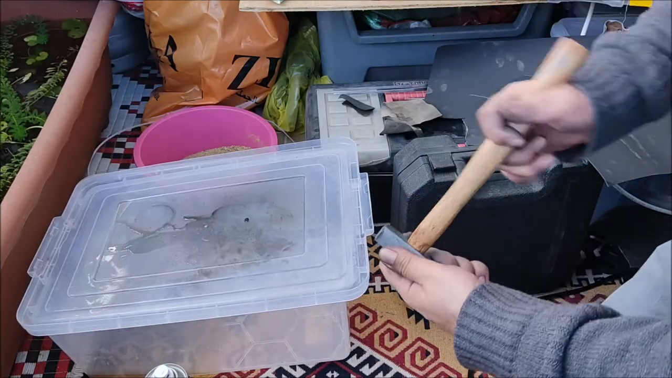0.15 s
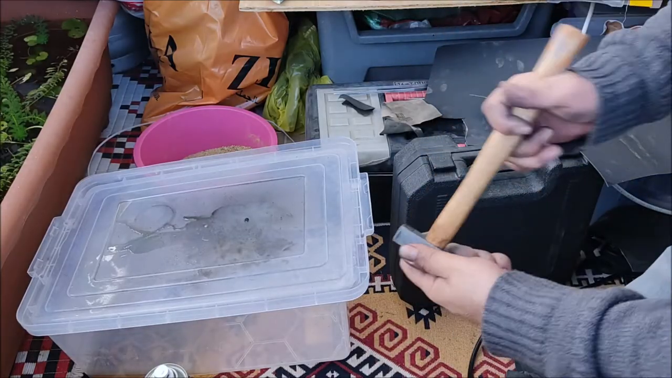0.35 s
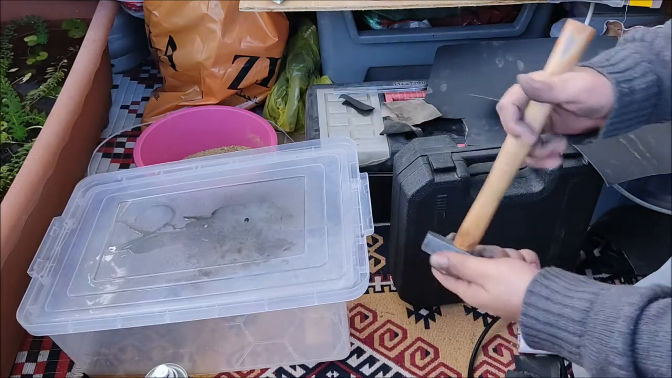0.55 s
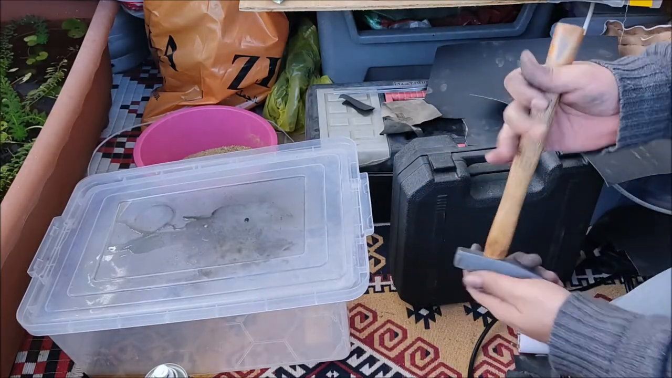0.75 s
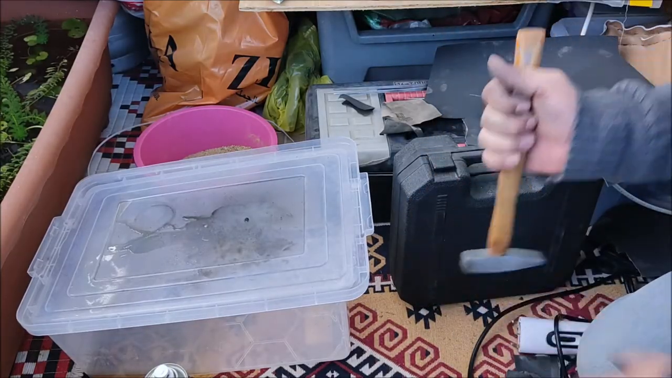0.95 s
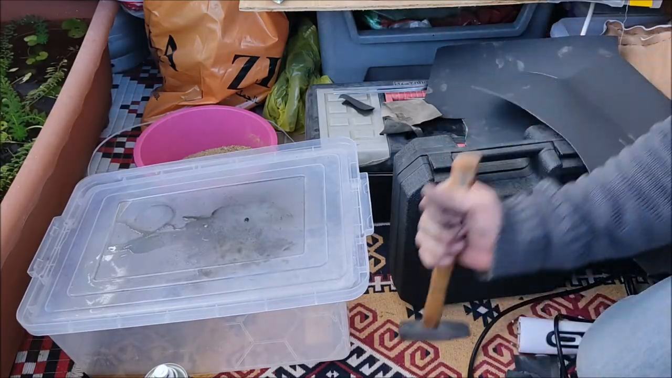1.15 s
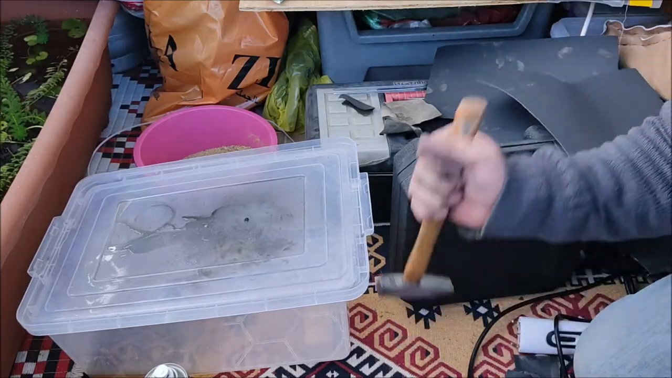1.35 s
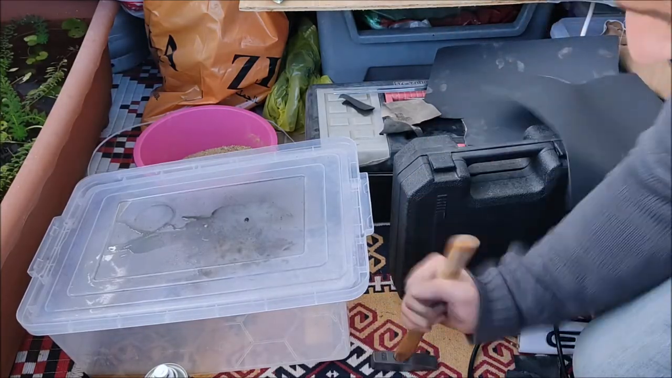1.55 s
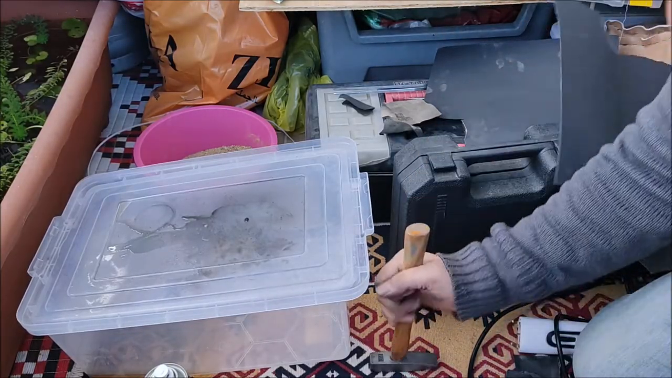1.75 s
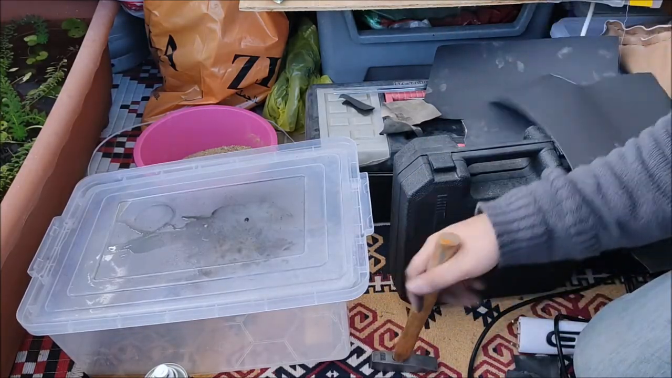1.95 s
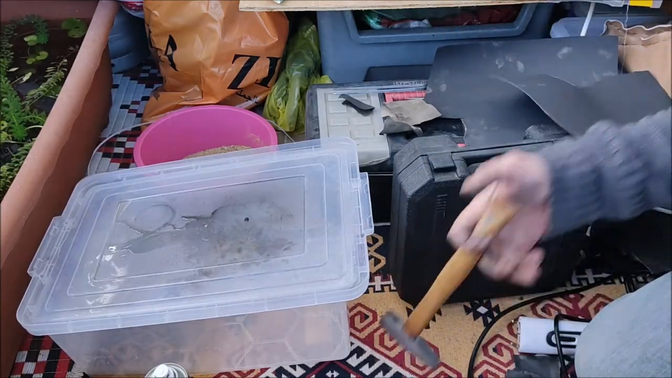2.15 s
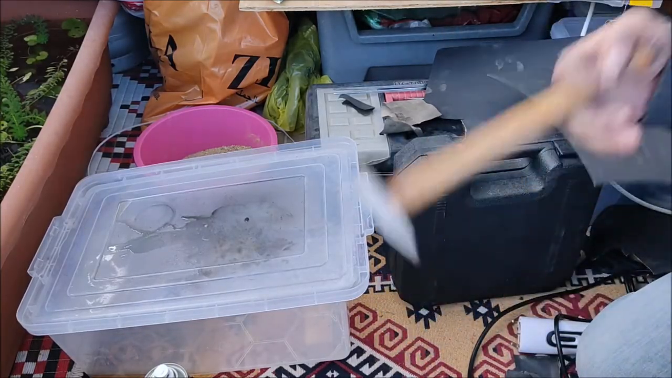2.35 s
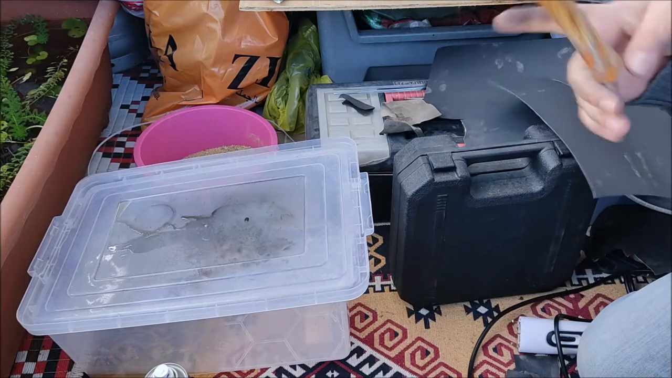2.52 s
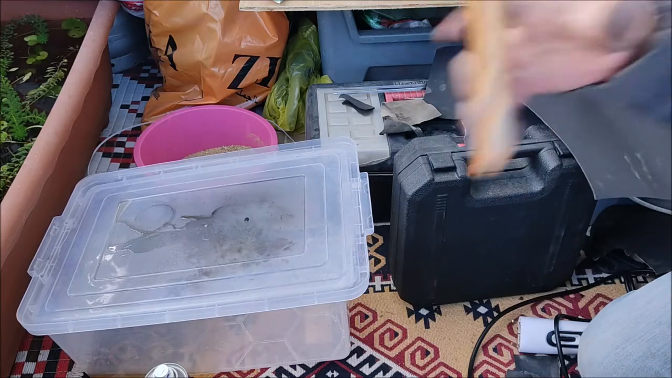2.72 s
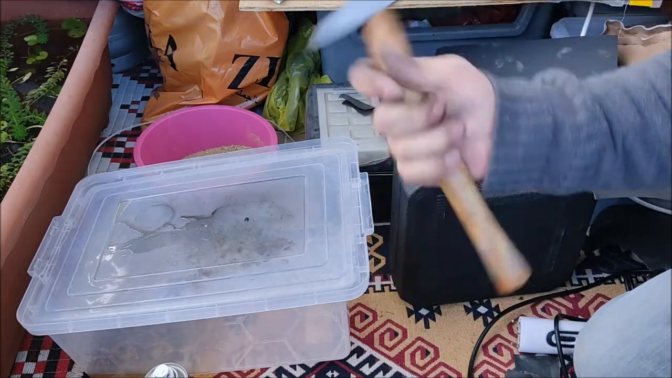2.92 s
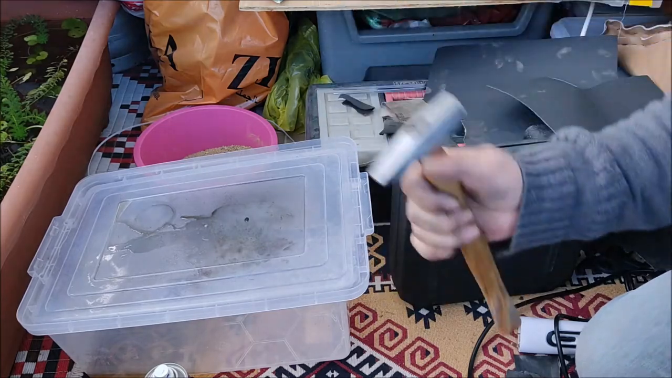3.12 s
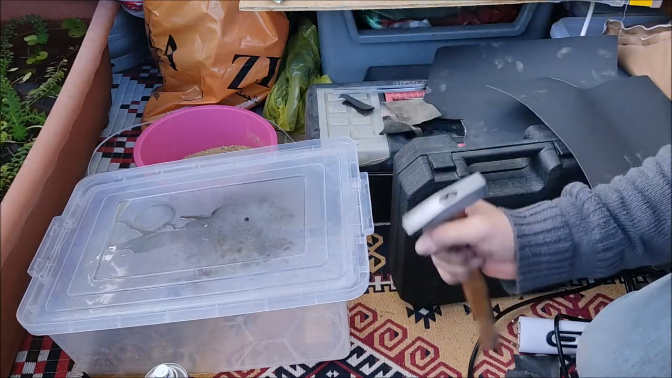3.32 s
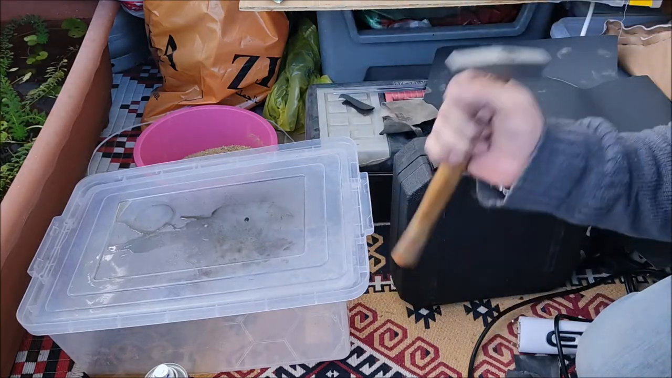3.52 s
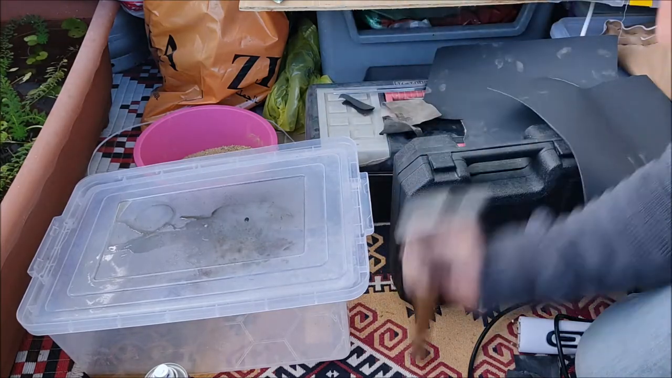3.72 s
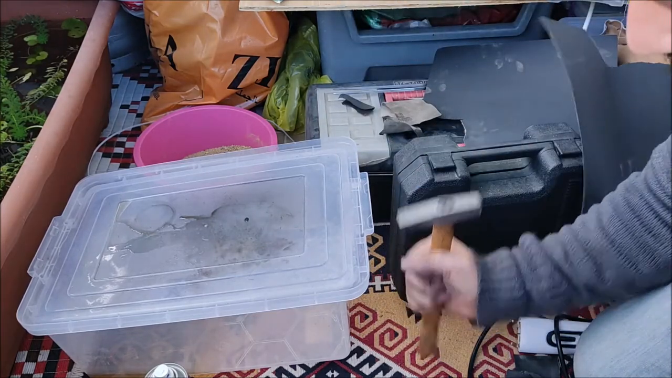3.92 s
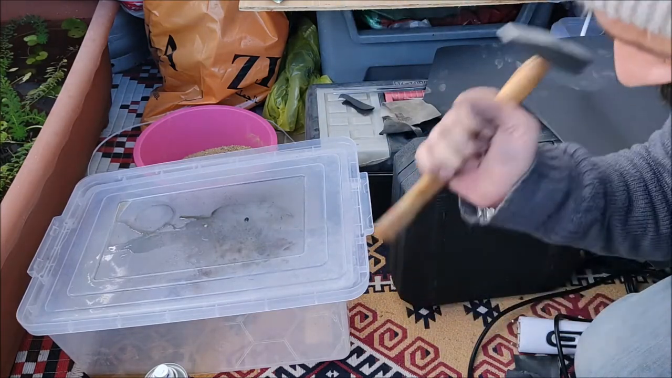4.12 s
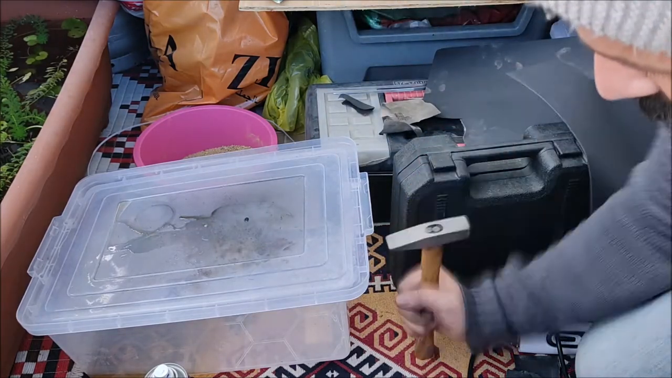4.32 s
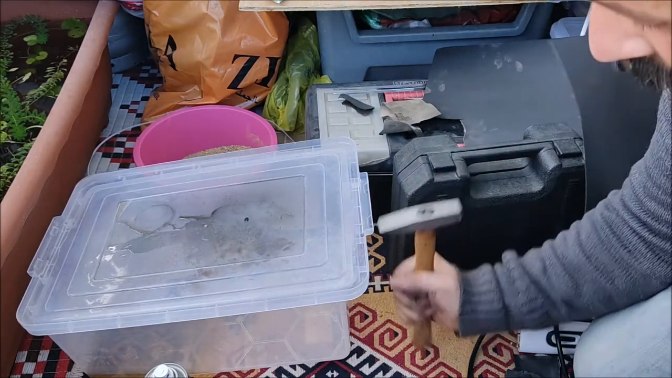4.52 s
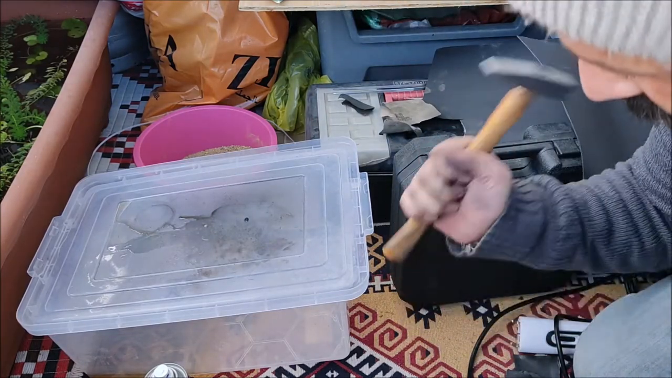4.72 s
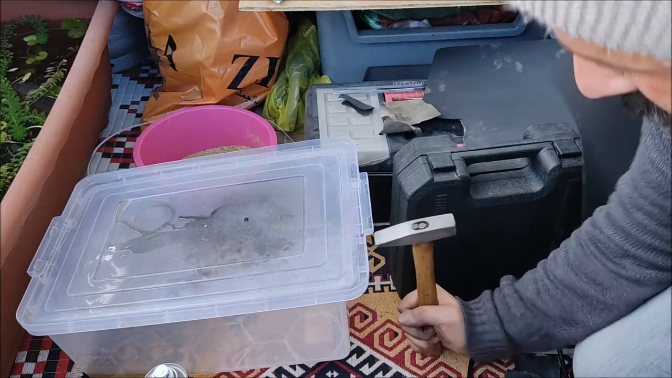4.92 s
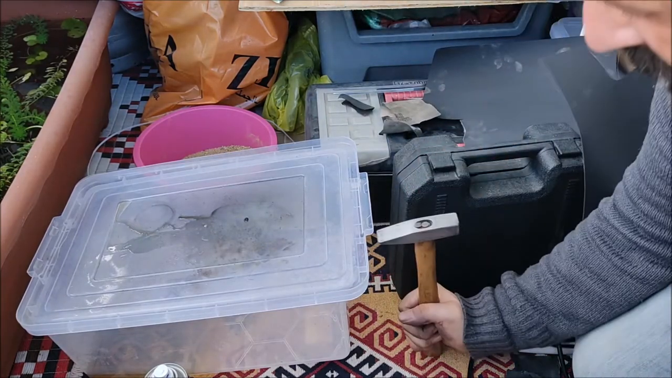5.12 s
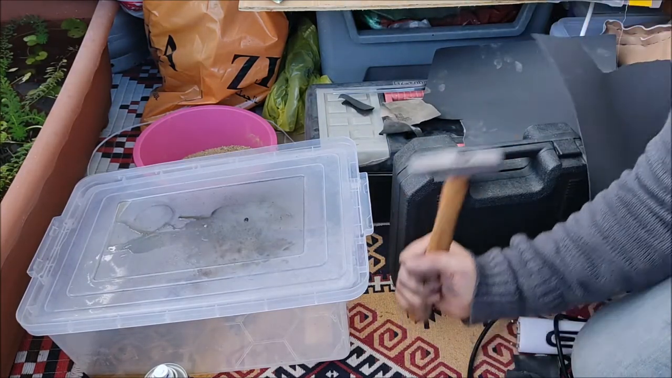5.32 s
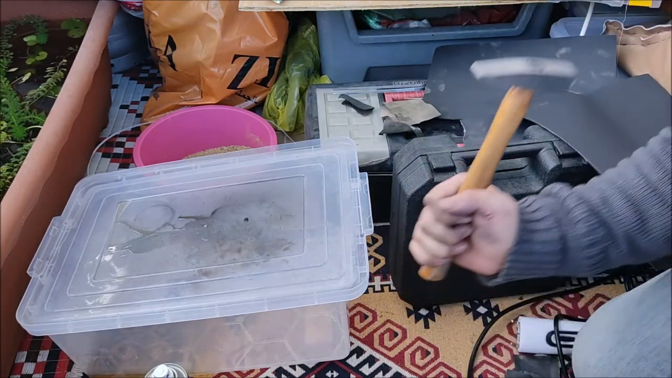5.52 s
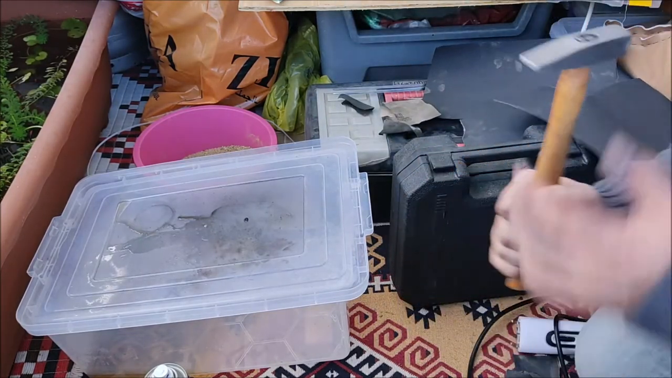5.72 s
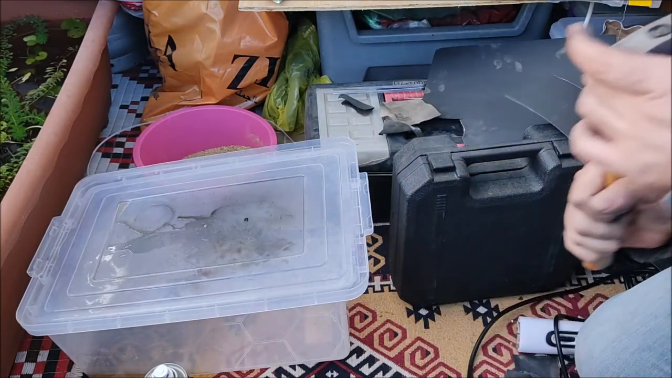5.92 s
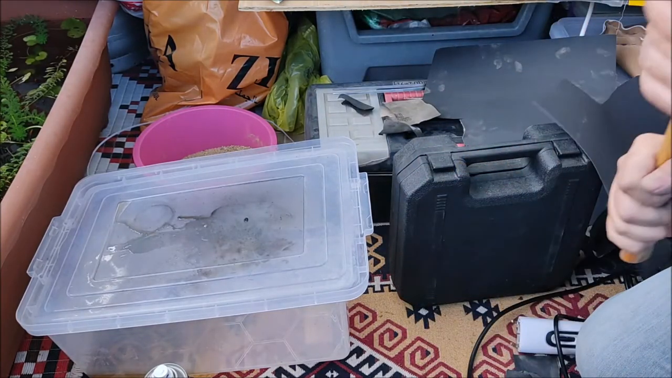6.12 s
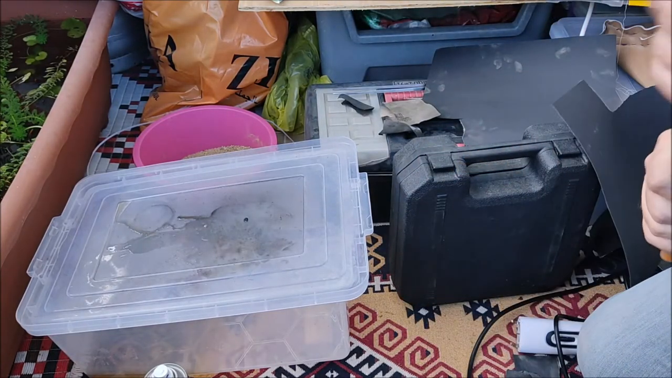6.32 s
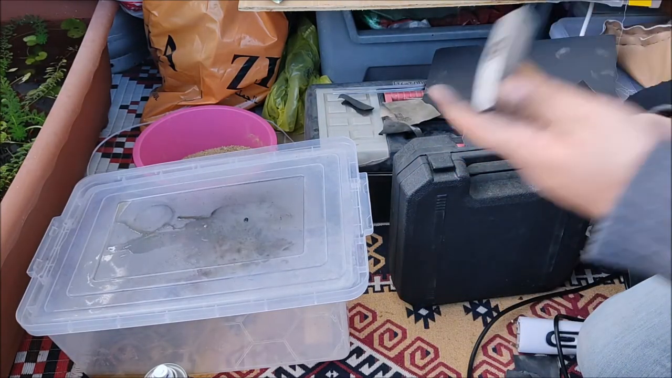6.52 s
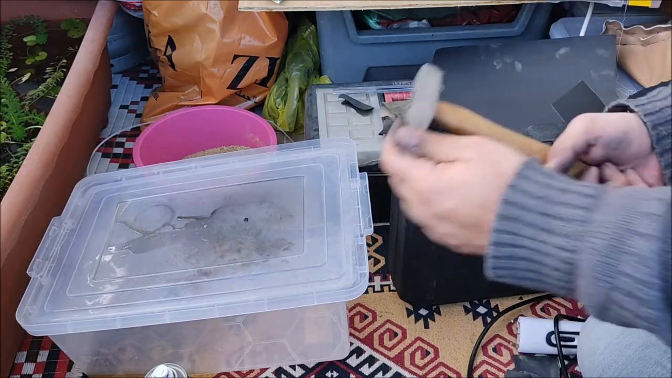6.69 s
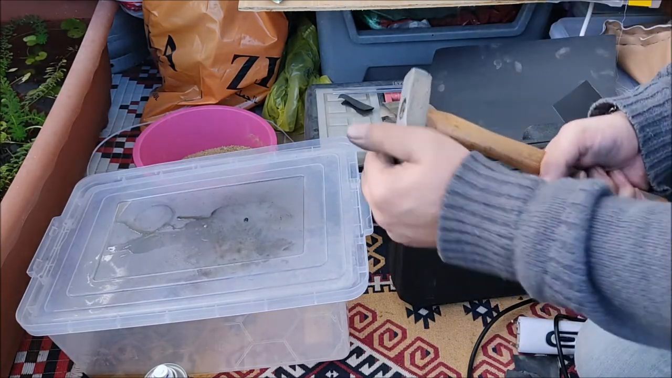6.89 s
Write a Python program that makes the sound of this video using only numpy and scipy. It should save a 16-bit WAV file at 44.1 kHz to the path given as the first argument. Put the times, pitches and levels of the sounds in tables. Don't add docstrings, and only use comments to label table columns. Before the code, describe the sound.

One hard hammer knock, a fumbling pause, then three quick cracks with short boxy echoes, over soft cloth rubbing and a faint dove coo.

```python
import sys
import numpy as np
from scipy import signal
from scipy.io import wavfile

SR = 44100
rng = np.random.default_rng(int(sys.argv[2]) if len(sys.argv) > 2 else 0)


def convert_level_to_amplitude(level_db):
    exponent = np.asarray(level_db, float) / 20
    return 10 ** exponent


def int16_out(signal):
    q = np.round(np.clip(np.atleast_2d(signal).T, -1, 1) * 32767)
    wavfile.write(sys.argv[1], SR, q.astype(np.int16))


N = 310993

# t/s, echo level re peak/dB of thud, knock, clack, ting
BLOWS = [
    (1.62, -19, -12.5, -15.5, -15),
    (3.83, -16, -18.5, -12.5, -11.5),
    (4.405, -15.5, -16, -14, -12),
    (4.975, -14.5, -18, -12.5, -11.5),
]
# peak/dB, then thud, knock, clack, ting/dB
EARLIER_BLOW = (-2.5, -28, -21.5, -30, -14)
# t/s, crack peak/dB, echo level re peak/dB of thud, knock, clack
KNOCKS = [
    (0.651, -42.5, 8.5, -21, -26),
    (1.053, -40.5, -27.5, -5, -30),
    (1.122, -46.5, -37, -11.5, -30),
    (1.176, -43, -14.5, -6, -28.5),
    (1.961, -36.5, -14, -15.5, -19),
    (2.037, -38.5, -35, -27, -19),
    (2.486, -26.5, -6.5, -15.5, -13.5),
    (3.349, -46, -6.5, -8.5, -15),
    (5.837, -36.5, -3, -14, -13.5),
]
PART_HZ = [350, 1100, 3200, 7500]
# f/Hz, level/dB, t60/s
FLOOR_MODES = [(210.8, -6.5, 0.45), (250, -13.5, 0.45), (323, -15, .32), (395.8, 0.5, 0.29),
               (471, -10, 0.25), (513.5, -10, 0.33), (606.5, -5, .22), (680.7, -0.5, 0.27), (776, -2, 0.3),
               (848, -9, .24), (922, -1.5, 0.33), (1068, -6.5, 0.28), (1206, -1.5, 0.052),
               (1380, -11.5, 0.12)]
# f/Hz, level/dB, t60/s
HEAD_MODES = [(1870, -6, 0.078), (2552, 7, 0.018), (2790, -12, .05), (3540, -2, 0.018), (4750, -7.5, 0.035),
              (7530, -12, 0.17), (8060, -1, 0.011)]
# f/Hz, level per Hz/dB
TAIL = [(50, -16), (160, -26.5), (250, -8.5), (400, -10.5), (700, -6), (950, -5), (1350, -17.5),
        (2000, -15), (2650, -16), (4000, -23), (6200, -28.5), (8000, -27.5), (12000, -31.5), (16000, -50)]
# f/Hz, t60/s
TAIL_T60 = [(60, 0.7), (250, 0.45), (700, 0.3), (2000, 0.37), (5000, 0.39), (10000, 0.27)]
# t/s, f/Hz, level/dB
SQUEAK = [
    (1.8, 1760, -52),
    (1.9, 1780, -54),
    (2.0, 1820, -47.5),
    (2.1, 1740, -63),
    (2.25, 1743, -57),
    (2.35, 1770, -48),
    (2.4, 1770, -70),
]
# start t/s, hold/s, top-band level/dB, loss per step toward the bass/dB
SLEEVE = [(.21, 0.033, -73, -8.5), (.5, .04, -63, -1.5), (1.18, 0.17, -48, 1.5), (1.36, 0.036, -48, 0.2),
          (1.44, 0.12, -53.5, 1.6), (1.58, 0.03, -47, 2), (1.87, 0.017, -48.5, 0.2),
          (1.96, 0.061, -55.5, -3.5), (2.03, 0.023, -46.5, 1.5), (2.18, .03, -53, 1),
          (2.24, 0.083, -49.5, 0), (2.37, 0.014, -58, -4), (2.6, 0.019, -53.5, -0.2),
          (2.71, 0.013, -68, -7), (4.07, 0.047, -48, 2), (4.2, 0.096, -52.5, -1),
          (4.35, 0.042, -50.5, -0.5), (4.64, 0.062, -48, 1.6), (4.69, 0.12, -53, 2),
          (4.91, 0.12, -51.5, 0.5), (5.17, 0.018, -55, -2.5), (5.31, 0.049, -51.5, 1.5),
          (5.39, 0.092, -52, 0.5), (5.625, 0.069, -46, 1.5), (5.72, 0.044, -56.5, -2.5),
          (5.93, 0.15, -56.5, 2), (6.08, .05, -50.5, 2.5), (6.2, 0.078, -55, 2.3), (6.28, 0.1, -49.5, 0.8),
          (6.86, 0.031, -72.5, -5.5)]
# start t/s, hold/s, top-band level/dB,
# loss per step toward the bass/dB
FINGERS = [(.1, 0.017, -54, 2.5), (.37, .1, -61.5, 5), (.64, .08, -53.5, 6.5), (.76, .03, -53, 6),
           (.82, .22, -52.5, 6.5), (1.07, 0.054, -60, 2), (2.82, 0.087, -49.5, 12),
           (2.905, 0.02, -39, 12.5), (3.0, 0.014, -39.5, 10), (3.15, .2, -52.5, 7.5),
           (3.37, 0.18, -54.5, 17), (3.42, 0.36, -75.5, -4), (3.72, 0.017, -64, 0),
           (3.78, 0.058, -50.5, 6.5), (5.51, 0.12, -55.5, 2), (6.125, 0.0076, -48, 2.5),
           (6.345, 0.023, -56.5, 1), (6.53, .08, -59.5, 24), (6.77, 0.014, -73, 2),
           (6.95, 0.044, -60.5, 19.5)]
# f/Hz, level per Hz/dB
STIR_COLOUR = [(50, -13.5), (125, -12.5), (195, 0.5), (310, -8.5), (385, -4), (480, -7.5), (760, -7.5),
               (1100, -7), (1700, -7), (4200, -17.5), (6200, -11), (8000, -9), (12000, -10), (16000, -34)]
# t/s, wind on the ports/dB, low stir of the kneeling body/dB
AIR = [(0.0, -40, -58), (0.12, -55, -47.5), (0.82, -62, -56), (1.1, -63, -57), (1.71, -72, -50),
       (2.73, -53, -56), (3.12, -45, -46.5), (3.77, -55, -48), (3.95, -56, -41.5), (4.28, -53.5, -46),
       (4.55, -59, -47), (4.91, -55, -41), (5.04, -63, -43), (5.38, -52.5, -50.5), (5.89, -55, -49),
       (6.05, -43, -50), (6.69, -62, -58), (7.05, -72, -52)]
# t/s, f/Hz, level/dB
COO = [
    (0, 430, -41),
    (.08, 452, -55),
    (.155, 438.6, -48),
    (.19, 427.5, -49),
    (.3, 436, -46),
    (.44, 434, -55.5),
    (.52, 408, -57),
    (.6, 390, -62),
    (.66, 379, -57),
]
# f/Hz, level per Hz/dB
TOWN_HUM = [(50, -80.5), (128, -93.5), (200, -96), (320, -92.5), (850, -94.5), (1500, -105), (4300, -104),
            (6000, -108.5), (8000, -100), (12000, -100), (16000, -110)]
# f/Hz, width/Hz, level/dB
HUM_TONES = [(91.8, 11, -63), (193.4, 14, -62), (258.1, 6.1, -66.5), (386.3, 26, -68)]
# f/Hz, correlation/1
LIKENESS = [(60, 0.077), (130, 0.085), (290, 0.83), (640, 0.28), (1410, 0.082), (3100, -0.091),
            (6820, -0.01), (15000, 0.029)]
# f/Hz, left-right/dB
LEAN = [(60, -2.5), (110, 6.5), (200, 5.5), (380, 4.5), (700, 3.5), (1290, 1), (2380, 0.5), (4400, -3),
        (8120, -2.5), (15000, 15.5)]

BLOW_PEAK_DB, TING_DB = -5, -2
EARLIER_S, ARRIVAL_S = -.07, .0025
SOFT_SHIFT_DB = 0.07
RUB_ATTACK_S, RUB_SAG_DB_PER_S, RUB_RELEASE_DB_PER_S = .022, 9.5, 169
PORT_HZ, PORT_WIDTH_HZ, PORT_DB = 7500, 950, 5
TOP_HZ, TOP_DB = 9260, -20.5


def in_time(rows):
    s, *columns = np.transpose(rows)
    return [np.interp(np.arange(N) / SR, s, c) for c in columns]


def at_hz(points, hz):
    points = np.array(points)
    return np.interp(np.log(hz), np.log(points[:, 0]), points[:, 1])


def rms_one(x):
    return x / np.sqrt(np.mean(x ** 2) + 1e-20)


def drift(rate_hz, spread_db):
    r = np.exp(-80 * np.pi * rate_hz / SR)
    white = rng.standard_normal(N // 40 + 2002)
    slow = signal.lfilter([1], [1, -2 * r, r * r], white)[2000:]
    return np.interp(np.arange(N) / 40, np.arange(len(slow)), convert_level_to_amplitude(spread_db * rms_one(slow)))


def ring(clicks, hz, t60_s):
    r, w = convert_level_to_amplitude(-60 / (t60_s * SR)), 2 * np.pi * hz / SR
    return signal.lfilter([0, np.sin(w)], [1, -2 * r * np.cos(w), r * r], clicks + 1e-18)


def port_pair(mid, side, hz, least_alike):
    alike = np.clip(at_hz(LIKENESS, hz), least_alike, 1)
    lean = convert_level_to_amplitude(at_hz(LEAN, hz) * np.array([[.5], [-.5]]))
    return lean * (np.sqrt(1 + alike) * mid + np.sqrt(1 - alike) * side * [[1], [-1]])


def bank(gain_at, white):
    out = np.zeros((2, N))
    edges_hz = 48 * 2 ** (np.arange(26) / 3)
    for k, (low, high) in enumerate(zip(edges_hz, edges_hz[1:])):
        sos = signal.butter(2, [low, high], "band", fs=SR, output="sos")
        mid, side = signal.sosfilt(sos, white[k % 2])
        hz = np.sqrt(low * high)
        out += gain_at(hz) * port_pair(mid, side, hz, -1)
    return out


def hum():
    out = 0
    for hz, width_hz, level_db in HUM_TONES:
        tone = rms_one(ring(rng.standard_normal(N), hz, 2.2 / width_hz))
        out = out + convert_level_to_amplitude(level_db) * drift(1.9, 2) * tone * convert_level_to_amplitude([[2.5], [-2.5]])
    return out


def wind(wind_db):
    sos = signal.butter(3, [13, 32], "band", fs=SR, output="sos")
    noise = signal.sosfilt(sos, rng.standard_normal((3, N)))
    return convert_level_to_amplitude(wind_db + [[2.1], [-2.1]]) * rms_one(noise[0] + 0.12 * noise[1:])


def dove(waver_db=0.066, flicker_db=1.5, lean_db=2.1, fade_s=.04):
    hz, level_db = in_time(COO)
    t = np.arange(N) / SR
    on = np.clip(np.minimum(COO[-1][0] + fade_s - t, t - COO[0][0] + fade_s) / fade_s, 0, 1)
    phase = 2 * np.pi * np.cumsum(hz * drift(28, waver_db)) / SR
    level = np.sqrt(2) * convert_level_to_amplitude(level_db) * drift(26, flicker_db) * on
    return level * np.sin(phase) * convert_level_to_amplitude([[lean_db], [-lean_db]])


def rubs(rows, colour_db):
    t, power = np.arange(0, N + 64, 64) / SR, 1e-14
    for s, hold_s, level_db, loss_db in rows:
        age = t - s
        fall_db = RUB_SAG_DB_PER_S * age + RUB_RELEASE_DB_PER_S * np.maximum(age - hold_s, 0)
        env = convert_level_to_amplitude(-fall_db) * np.clip(age / RUB_ATTACK_S + .5, 0, 1)
        step_db = level_db - loss_db * np.arange(4)[::-1] + colour_db
        power = power + np.outer(convert_level_to_amplitude(step_db), env) ** 2
    return np.array([np.interp(np.arange(N) / SR, t, p) for p in power])


def rustle(cloth_db, patchy_db=2.0, grain_db=2.5, grains_per_s=2500):
    shape = (2, 2, N)
    heights = convert_level_to_amplitude(grain_db * np.minimum(rng.exponential(1, shape), 4))
    grains = (rng.random(shape) < grains_per_s / SR) * heights
    white = rms_one(rng.standard_normal(shape) * (1 + grains))
    together = drift(15.4, 0.56)
    levels_db = np.array(cloth_db) + [[15.0], [18.0], [20.0], [12.0]]

    def gain_at(hz):
        place = np.interp(np.log(hz), np.log([550, 1300, 3300, 6500]), [0, 1, 2, 3])
        share = np.clip(1 - np.abs(place - np.arange(4)), 0, 1)
        cloth = convert_level_to_amplitude(share @ levels_db + at_hz(STIR_COLOUR, hz)) * together * drift(7.3, patchy_db)
        return np.hypot(cloth, convert_level_to_amplitude(at_hz(TOWN_HUM, hz)) * np.sqrt(SR / 2))
    return bank(gain_at, white)


def squeak(width_hz=90, flicker_db=3, fade_s=.05):
    first, last = SQUEAK[0], SQUEAK[-1]
    hz, level_db = in_time([(first[0] - fade_s, first[1], -99), *SQUEAK, (last[0] + fade_s, last[1], -99)])
    sos = signal.butter(2, width_hz, fs=SR, output="sos")
    slow = signal.sosfilt(sos, rng.standard_normal((2, 2, N)))
    phase = 2 * np.pi * np.cumsum(hz) / SR
    tone = rms_one(slow[0] * np.cos(phase) + slow[1] * np.sin(phase))
    return convert_level_to_amplitude(level_db) * drift(13, flicker_db) * tone


def hits():
    blows = [(s, BLOW_PEAK_DB, *parts) for s, *parts in BLOWS]
    return blows + [(*row, TING_DB) for row in KNOCKS]


def strengths(hz):
    times_s, levels_db = [], []
    for s, peak_db, *parts_db in [(EARLIER_S, *EARLIER_BLOW)] + hits():
        part_hz = PART_HZ * convert_level_to_amplitude([SOFT_SHIFT_DB * peak_db])
        times_s.append(s + ARRIVAL_S)
        levels_db.append(peak_db + at_hz(np.transpose([part_hz, parts_db]), hz))
    return np.array(times_s), np.array(levels_db)


def tail(level_db=20.5, rise_cycles=0.64, hold_s=0.0022, uneven_db=1.5):
    t = np.arange(N) / SR

    def gain_at(hz):
        env = np.zeros(N)
        for s, db in zip(*strengths(hz)):
            span = slice(max(round(s * SR), 0), round((s + .7) * SR))
            age = t[span] - s
            late = np.sqrt(age ** 2 + hold_s ** 2) - hold_s
            rise = 1 - np.exp(-np.abs(age) / (ARRIVAL_S + rise_cycles / hz))
            env[span] += convert_level_to_amplitude(db - 60 * late / at_hz(TAIL_T60, hz)) * rise
        return env * convert_level_to_amplitude(at_hz(TAIL, hz)) * drift(19.6, uneven_db)
    return convert_level_to_amplitude(level_db) * bank(gain_at, rng.standard_normal((2, 2, N)))


def rings(modes, level_db, feed_s, longest_t60_s):
    out, t, white = np.zeros((2, N)), np.arange(N) / SR, rng.standard_normal((2, N))
    for k, (hz, mode_db, t60_s) in enumerate(modes):
        times_s, dbs = strengths(hz)
        feed = np.zeros(N)
        for s, db in zip(times_s, dbs + rng.normal(0, 1.0, len(times_s))):
            span = slice(max(round(s * SR), 0), round((s + .3) * SR))
            feed[span] += convert_level_to_amplitude(db) * np.exp(-(t[span] - s) / feed_s)
        mid, side = np.roll(white, 9973 * k, axis=1) * feed / np.sqrt(feed_s * SR)
        pair = port_pair(mid, side, hz, 0)
        out += convert_level_to_amplitude(mode_db + level_db) * ring(pair, hz, min(t60_s, longest_t60_s))
    return out


def crack(tilt_db=(2, 6, 5, -6), dulling=(0, .1, .2, .28)):
    out, t = np.zeros((2, N)), np.arange(1200) / SR
    split = [signal.butter(2, [hz / 1.75, min(hz * 1.75, 9000)], "band", fs=SR, output="sos")
             for hz in PART_HZ]
    top = signal.butter(3, 8500, fs=SR, output="sos")
    for s, peak_db, *parts_db in hits():
        noise = rng.standard_normal((3, len(t))) ** 3
        burst = (noise[0] + .4 * noise[1:]) * np.exp(-t / .0025) * np.minimum(t / .0008, 1)
        burst[:, 36:40] -= 3.5
        sound = 0
        for sos, part_db, tilt, dull in zip(split, parts_db, tilt_db, dulling):
            gain = convert_level_to_amplitude(part_db + tilt + dull * peak_db)
            sound = sound + gain * rms_one(signal.sosfilt(sos, burst))
        sound = signal.sosfilt(top, sound)
        i = round((s + ARRIVAL_S) * SR)
        out[:, i:i + len(t)] += convert_level_to_amplitude(peak_db + 3) * sound / np.abs(sound).max()
    return out


def scene():
    wind_db, stir_db = in_time(AIR)
    power = rubs(SLEEVE, colour_db=[-3.8, -0.41, 0.097, 0.5]) + rubs(FINGERS, colour_db=[11, 2.5, .3, .3])
    power[0] += (convert_level_to_amplitude(stir_db - 3.5) * drift(8, 1.5)) ** 2
    background = hum() + wind(wind_db + 3.0) + dove()
    handling = rustle(10 * np.log10(power)) + squeak()
    floor = rings(FLOOR_MODES, level_db=0.5, feed_s=0.059, longest_t60_s=0.14)
    head = rings(HEAD_MODES, level_db=-1.0, feed_s=0.013, longest_t60_s=.07)
    return background + handling + tail() + floor + head + crack()


def top_cut(x):
    return signal.sosfilt(signal.butter(12, 15800, fs=SR, output="sos"), x)


def record(dry):
    r = np.exp(-np.pi * PORT_WIDTH_HZ / SR)
    poles = [1, -2 * r * np.cos(2 * np.pi * PORT_HZ / SR), r * r]
    port = signal.lfilter((1 - r * r) / 2 * np.array([1, 0, -1]), poles, dry)
    x = dry + (convert_level_to_amplitude(PORT_DB) - 1) * port
    low = signal.sosfilt(signal.butter(16, TOP_HZ, fs=SR, output="sos"), x)
    high = signal.sosfilt(signal.butter(4, TOP_HZ, "high", fs=SR, output="sos"), x)
    x = low + convert_level_to_amplitude(TOP_DB) * high
    mix = 1.6 * np.tanh(x / 1.6)
    return top_cut(mix)


dry = scene()
out = record(dry)
int16_out(out)
```